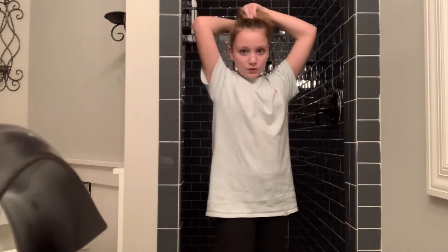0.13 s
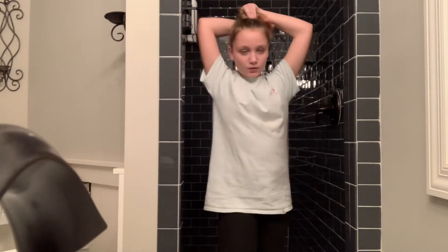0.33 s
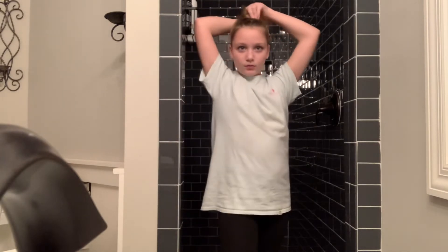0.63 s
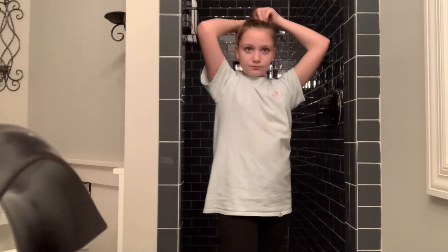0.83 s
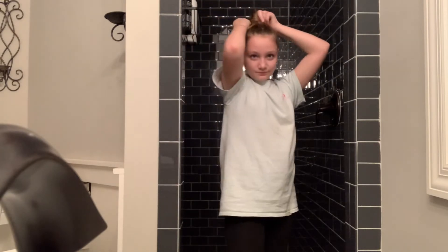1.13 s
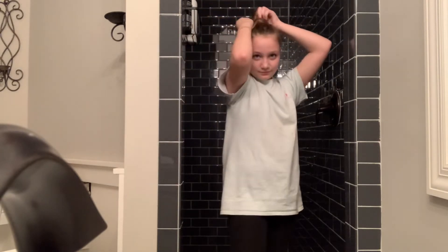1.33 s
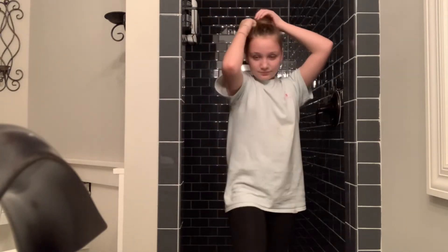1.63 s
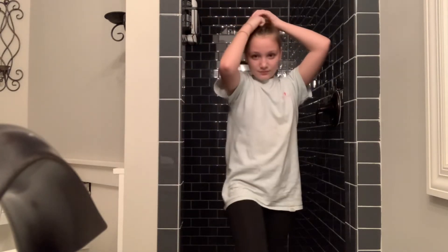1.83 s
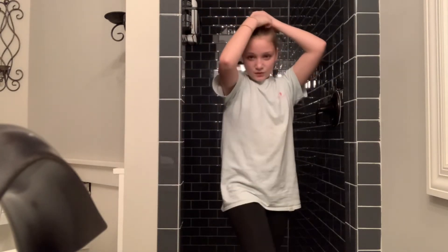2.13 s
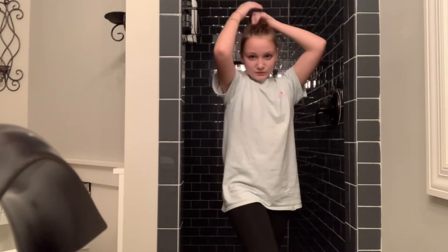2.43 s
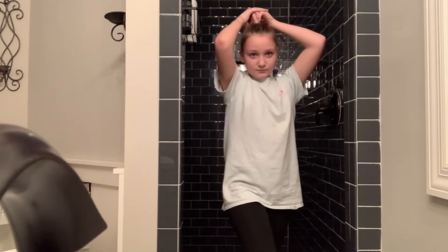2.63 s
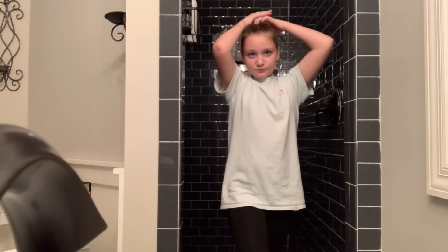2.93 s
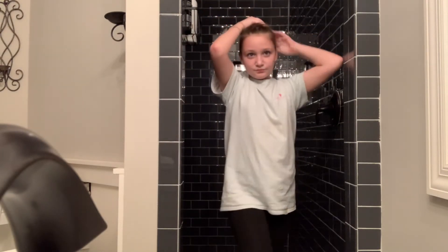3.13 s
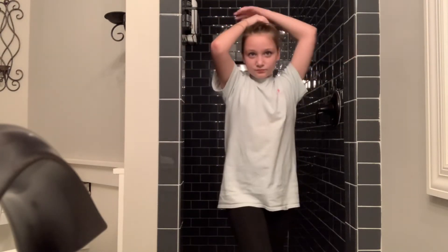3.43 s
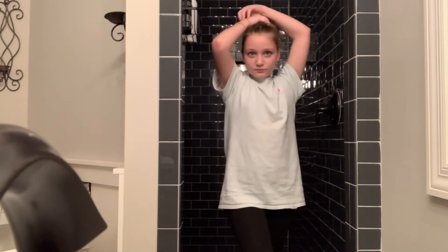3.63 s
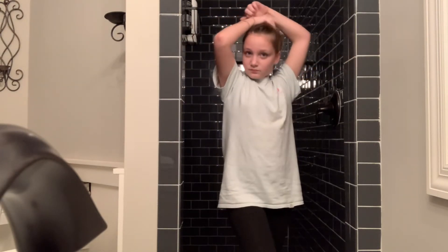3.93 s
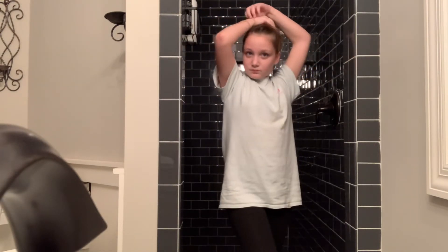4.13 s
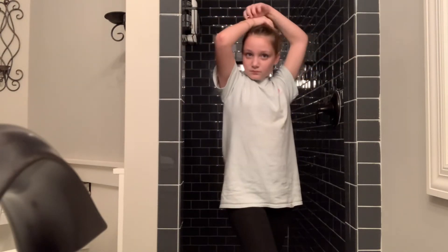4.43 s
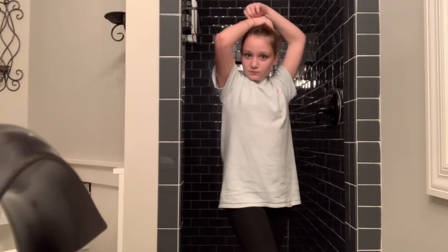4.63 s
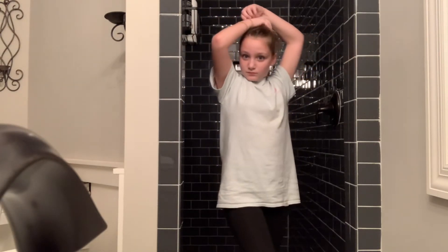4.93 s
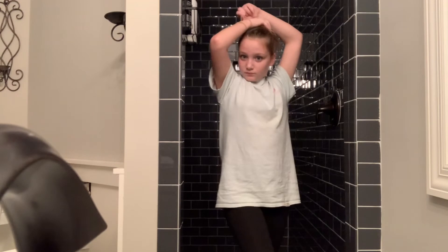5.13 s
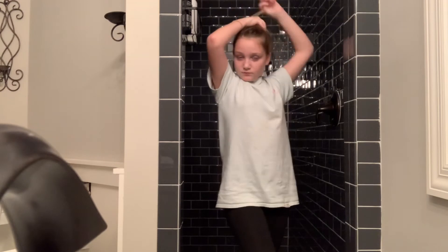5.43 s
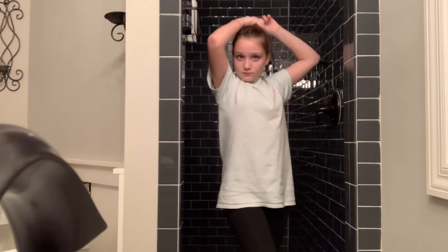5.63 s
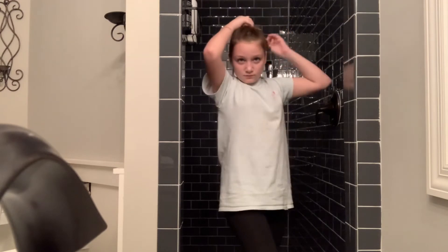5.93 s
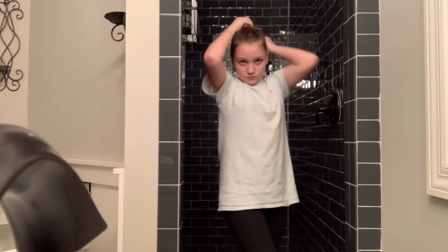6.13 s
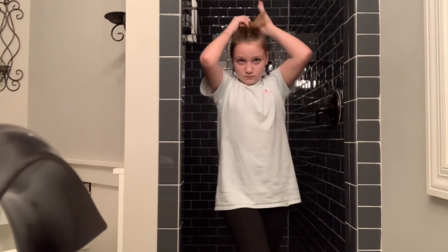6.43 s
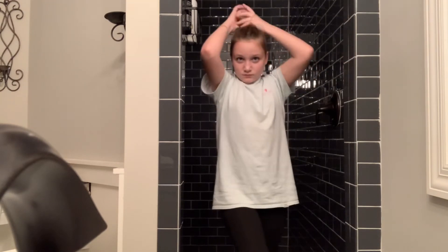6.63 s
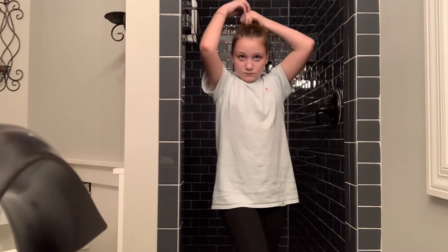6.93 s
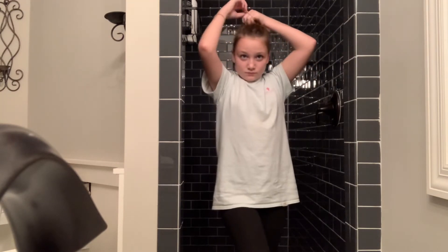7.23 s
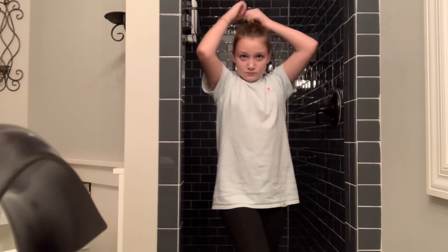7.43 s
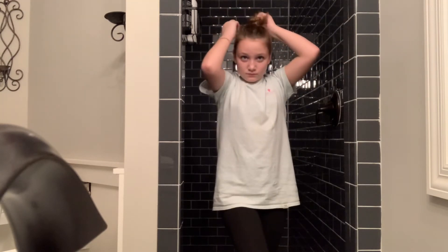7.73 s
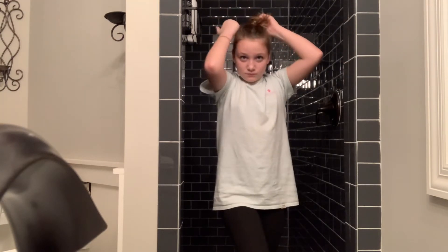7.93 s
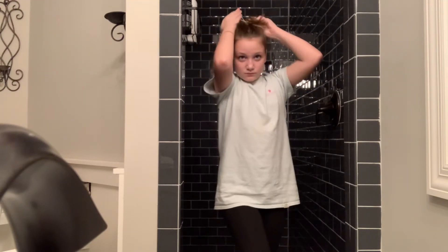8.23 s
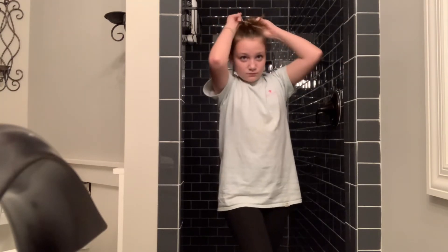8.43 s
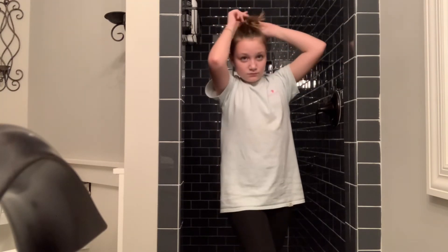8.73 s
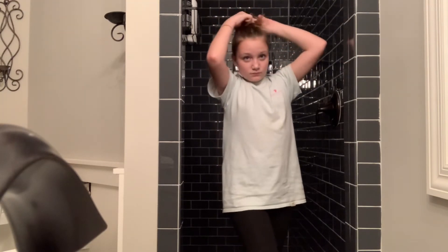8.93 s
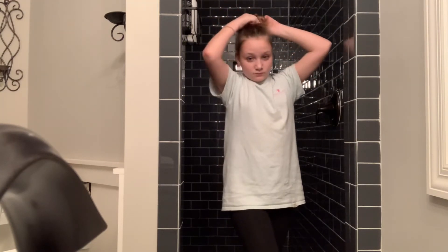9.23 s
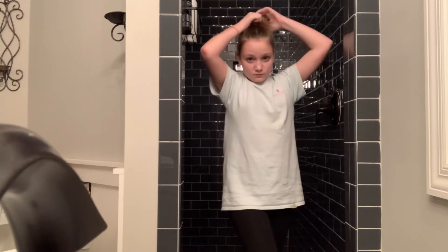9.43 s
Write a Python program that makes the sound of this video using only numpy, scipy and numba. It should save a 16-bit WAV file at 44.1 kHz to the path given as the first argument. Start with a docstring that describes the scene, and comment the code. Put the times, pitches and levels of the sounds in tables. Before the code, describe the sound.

For about 9.7 seconds, water pours without pause from a tap into a bathtub in a reverberant tiled bathroom. Low, boomy drumming, mostly below 400 Hz, surges unevenly, with soft thumps near 0.3, 1.3, 2.1, 2.4 and 2.9 seconds, then around 3.8, 4.9, 5.7 and 6.7 to 6.9. Over it lies a dense fizz of tiny rising bubbles, fullest in the mids with gentler airy spray. Gurgles swell at the start and near 1, 2.5, 3, 4.4, 6 and 7.5 seconds. Splashes and plops are scattered throughout: a bright one around 2.5, a high, pinging drip at 3.4, a cluster at 4.3 to 4.6, a sprayier burst at 6.8, several at 7 to 7.6, another near 8.1. The drumming dips around 4, 5.4 and 9.2 but the flow never stops. Stereo pickup at a distance, with short room smear and ringing tub tones.

```python
"""A low drumming and a steady fizz: a tap pours into a bathtub across a tiled bathroom.
The drumming is coloured noise that surges and thumps. The fizz is thousands of fading sines, one a
bubble or drop, with gurgles that swell and fade and, now and then, a louder splash.
The hard room smears the water and rings at its own pitches; two microphone ports hear it in stereo."""
import sys
import numpy as np
from scipy import signal
from scipy.fft import rfft, irfft
from scipy.io import wavfile
from scipy.ndimage import uniform_filter1d
from numba import njit

SR = 44100
rng = np.random.default_rng(int(sys.argv[2]) if len(sys.argv) > 2 else 0)


def log_audio(samples):
    """Write samples as a 16-bit WAV file to the path given in sys.argv[1]."""
    # one column per channel
    frames = np.atleast_2d(samples).T
    # limit to full scale, then quantise
    limited = np.clip(frames, -1, 1)
    pcm = np.round(limited * 32767).astype(np.int16)
    wavfile.write(sys.argv[1], SR, pcm)


def amplitude_ratio(level_db):
    """Convert a level in decibels to the matching linear amplitude (field) ratio."""
    exponent = np.asarray(level_db, float) / 20
    return 10 ** exponent


N = 422919  # samples
HZ = np.maximum(np.arange(N // 2 + 1) * SR / N, 1)  # frequency of each spectrum bin
SPRAY_HZ, SPRAY_FADE_S = 5000, .012  # lowest drop of a splash; time in which a burst of drops thins to 1/e


def unit(x):
    """Scale to rms 1."""
    return x / np.sqrt(np.mean(np.abs(x) ** 2))


def over_hz(table):
    """A (Hz, value) table read on a log-frequency axis."""
    hz, value = np.transpose(table)
    return np.interp(np.log(HZ), np.log(hz), value)


def walk(s, rate):
    """Random drift of spread near 1, read at times s, with so many knots per second (below 40)."""
    knots = rng.standard_normal(int(N / SR * 40) + 2)
    return np.interp(s * rate, np.arange(len(knots)), knots)


def outliers(chance, scatter_db, floor=1.01):
    """Extra level in dB: little for most bubbles, much for a few."""
    return -scatter_db * np.log(floor - chance)


def size_tilt(hz):
    """Level in dB that rises with a bubble's pitch."""
    return 15 * np.log10(hz / 1000)


@njit
def ring_out(n, start, turn, fade, glide, size):
    """Each bubble is a fading sine that rises in pitch."""
    out = np.zeros(n)
    for k in range(len(start)):
        value = size[k] + 0j
        step = fade[k] * np.exp(1j * turn[k])
        bend = np.exp(1j * glide[k])
        end = start[k] + int(-4.5 / np.log(fade[k]))
        for i in range(start[k], min(n, end)):
            value = value * step
            step = step * bend
            out[i] += value.imag
    return out


def bubbles(s, hz, db, cycles, rise):
    """Bubbles that fall to 1/e in so many cycles and rise in pitch by a share meanwhile."""
    turn = 2 * np.pi * np.clip(hz, 100, .42 * SR) / SR  # radians per sample
    life = cycles * 2 * np.pi / turn  # samples
    return ring_out(N, (s * SR).astype(int), turn, np.exp(-1 / life), rise * turn / life, amplitude_ratio(db))


def ports(a, b, alike):
    """Two ports that share this much of a sound at each frequency."""
    return np.array([a, alike * a + np.sqrt(1 - alike ** 2) * b])


# How the pour comes and goes. Each row: time in seconds, drumming level in dB (swings scaled per band),
# froth in dB above its usual level (lessened for the spray and the largest bubbles).
POUR = [(.05, -32.5, -0.5), (.35, -32, 1.5), (.8, -35, -1.5), (1.2, -33.5, -0.5), (1.5, -33.5, -1),
        (2.45, -34, 1), (2.8, -35, -2), (3.7, -32, 0.5), (4.0, -37.5, -1), (4.9, -31, 1),
        (5.4, -36.5, -0.5), (5.8, -34, 0.5), (6.55, -36.5, -2), (6.85, -34.5, 1), (7.8, -33, 1),
        (9.2, -37, 0), (9.55, -33.5, -1.5)]
# Heavier slugs of water thump the tub. Each row: time in seconds (half a thump length before the peak),
# peak in dB above the drumming (scaled per band).
SLUGS = [(.31, 8.5), (1.33, 4), (2.05, 4), (2.42, 8), (2.87, 6.5), (3.8, 3.5), (4.855, 3.5), (5.66, 4.5),
         (6.66, 7.5), (6.85, 8)]
# Colour of the drumming. Each row: frequency in Hz, relative level in dB per Hz.
DRUM_COLOUR = [(25, -40), (42, -16.5), (60, -10), (100, -9), (140, -2), (175, -6), (250, -7), (400, -13),
               (800, -28.5), (1500, -100)]
# Edges of the low, middle and high bands of the drumming: each entry a frequency in Hz.
DRUM_EDGES_HZ = [0, 95, 170, 20000]
# How far each band follows the pour and the thumps: each entry a share of the dB swing.
BAND_FOLLOW = [0.4, 1, .6]


def tub(ring, surge_db=1.5):
    """The jet's churning drives the tub walls and low room modes as noise; three bands surge apart."""
    thump_s, alike_hz = 0.036, 248
    t, drum_db, _ = np.transpose(POUR)
    s = np.arange(N) / SR
    flow_db = np.interp(s, t, drum_db)
    for at, db in SLUGS:
        flow_db += db * np.exp(-((s - at) / thump_s - .5) ** 2)
    mean_db = np.mean(flow_db)
    churn = 0
    for low, high, share in zip(DRUM_EDGES_HZ, DRUM_EDGES_HZ[1:], BAND_FOLLOW):
        swing_db = share * (flow_db - mean_db) + surge_db * walk(s, 14.0)
        noise = rng.standard_normal((2, N)) * amplitude_ratio(swing_db)
        churn = churn + rfft(noise, N) * ((HZ >= low) & (HZ < high))
    alike = 1 / (1 + (HZ / alike_hz) ** 6)  # the lowest modes fill the room as one
    drumming = irfft(ports(*churn, alike) * amplitude_ratio(over_hz(DRUM_COLOUR)) * ring, N)
    return unit(drumming) * amplitude_ratio(mean_db + 0.48)


def froth(per_s=5000, cycles=3.82, scatter_db=2.0, swell_db=1.0, patchy_db=1.26, quick_db=3.0):
    """The steady mass of bubbles where the jet lands; small ones are many, a few stand out."""
    gurgle_hz, fine_hz = 1560, 7500  # from the body of the froth to its spray
    when, which, chance = rng.random((int(per_s * N / SR), 3)).T
    s = when * N / SR
    hz = (14 + 120 * which) ** 2
    t, _, froth_db = np.transpose(POUR)
    fine = np.clip(np.log(hz / gurgle_hz) / np.log(fine_hz / gurgle_hz), 0, 1)
    follow = (1 - 0.32 * fine) * np.clip(np.log2(hz / 600), 0, 1)  # the largest bubbles come steadily
    db = follow * np.interp(s, t, froth_db)
    # neighbouring bubble sizes come and go together, slowly and quickly, the spray in gusts
    band = (2 * np.log2(hz / 190)).astype(int)  # half octaves
    for depth_db, rate in ((swell_db, 4.0), (patchy_db, 14.0)):
        db += depth_db * np.choose(band, [walk(s, rate) for _ in range(14)])
    db += quick_db * fine * walk(s, 16.0)
    db += size_tilt(hz) + outliers(chance, scatter_db, 1.003)  # the tilt makes it flat per Hz
    return unit(bubbles(s, hz, db, cycles, 0.043))


def patter(per_s=40, level_db=-13.5, scatter_db=1.5, octaves=.25, cycles=7.0, fade_s=.008, count=16):
    """Stray drops: many small sudden swarms, each around a bubble size of its own."""
    when, which, chance = rng.random((int(per_s * N / SR), 3)).T[:, :, None]
    late, size = rng.random((len(when), 2, count)).transpose(1, 0, 2)
    s = (when * N / SR - fade_s * np.log(1 - late)).clip(0, N / SR)
    hz = (32 + 92 * which) ** 2 * 2 ** (octaves * (size - .5))
    db = level_db + size_tilt(hz) + outliers(chance, scatter_db)
    return bubbles(s.ravel(), hz.ravel(), db.ravel(), cycles, 0.039)


def spatter(per_s=10, level_db=-14.0, scatter_db=3.0, low_hz=8000, cycles=3.3, count=30):
    """Small bursts of the finest drops, spread over one octave, come at random."""
    gap, chance = rng.random((100, 2)).T[:, :, None]
    late, size = rng.random((len(gap), 2, count)).transpose(1, 0, 2)
    s = np.cumsum(-np.log(1 - gap), axis=0) / per_s - SPRAY_FADE_S * np.log(1 - late)
    hz = low_hz * 2 ** size
    db = level_db + size_tilt(hz) + outliers(chance, scatter_db)
    return bubbles(s.ravel(), hz.ravel(), db.ravel(), cycles, 0.037)


# Longer gurgles that swell and fade. Each row: middle in seconds, length in seconds,
# pitch of the bubbles in Hz, range of pitch in octaves, bubble level in dB before the tilts for size.
SWELLS = [(0.101, 0.29, 1520, 1.5, -13.5), (1.022, 0.35, 3220, 0.24, -14.5), (2.503, 0.22, 2630, 1.35, -16),
          (3.05, 0.2, 1444, 0.27, -12.5), (4.447, 0.36, 2420, 1.27, -12), (5.952, 0.31, 2650, 0.95, -11.5),
          (7.46, 0.21, 2340, 0.89, -12)]


def gurgles(cycles=4.2, scatter_db=3.5, count=90):
    """Bubbles come thickest in the middle of each gurgle, a few of them standing out."""
    middle, length, hz, octaves, db = np.transpose(SWELLS)[:, :, None]
    a, b, size, chance = rng.random((len(middle), 4, count)).transpose(1, 0, 2)
    s = (middle + length * (a + b - 1) / 2).clip(0)
    pitch = hz * 2 ** (octaves * (size - .5))
    db = db + size_tilt(pitch) + 12 * np.log10(pitch / hz) + outliers(chance, scatter_db)
    return bubbles(s.ravel(), pitch.ravel(), db.ravel(), cycles, 0.067)


# Louder splashes. Each row: start in seconds, pitch of the bubbles in Hz, range of pitch in octaves,
# bubble level in dB, fine spray level in dB, both before the tilts for size.
SPLASHES = [(1.216, 4200, 0.68, -10, -11), (1.257, 1490, 0.59, -13, -3), (1.4662, 1960, 0.17, -8, -16),
            (1.7669, 2270, 1.1, -7.5, -11), (2.279, 1740, 0.44, -12, -15), (2.406, 3020, 1.16, -7.5, -8),
            (2.537, 2870, 1.3, -3, -7), (2.597, 1070, 0.09, -15, -15), (2.8567, 3460, 0.99, -11.5, -9),
            (3.398, 5120, .12, -3, -7), (3.52, 3180, 0.32, -11, -6), (4.268, 1650, 0.4, -12, -10),
            (4.412, 2110, 0.5, -12, -7), (4.487, 2300, 1.1, -9, -12), (4.557, 5030, .3, -7, -10),
            (5.42, 4180, 0.2, -7.5, -17), (5.8269, 2870, 1.6, -7, -9), (6.596, 3900, 0.11, -14, -20),
            (6.823, 3330, 0.37, -7.5, -1.5), (7.031, 3520, .2, -9, -19), (7.089, 2050, 0.47, -11, -13),
            (7.3925, 2390, 1.2, -6, -10), (7.5476, 2740, 0.84, -13.5, -7.5), (7.596, 2570, 1, -8, -20),
            (7.881, 1634, 0.51, -11, -14), (8.135, 1490, 0.49, -7.5, -7), (8.686, 1063, 0.34, -14, -18),
            (8.761, 2980, 0.77, -15, -9), (9.549, 4500, 0.49, -9, -10)]


def splashes(cycles=4.77, brighter_db=6, count=40):
    """Each splash is a sudden swarm of bubbles around one size, with fine drops, that thins out."""
    swarm_fade_s, spray_octaves = .007, 1.7
    s, hz, octaves, db, spray_db = np.transpose(SPLASHES)[:, :, None]
    late, size, spray_late, spray_size = rng.random((len(s), 4, count)).transpose(1, 0, 2)
    delay = -np.array([swarm_fade_s * np.log(1 - late), SPRAY_FADE_S * np.log(1 - spray_late)])
    start = s + delay
    spread = (np.arange(count) + size) / count - .5
    pitch = np.array([hz * 2 ** (octaves * spread), SPRAY_HZ * 2 ** (spray_octaves * spray_size)])
    db = np.array([db, spray_db]) + size_tilt(pitch)
    db[0] += 12 * np.log10(pitch[0] / hz)  # the smaller bubbles of a swarm ring louder
    db[1] += brighter_db * np.log10(pitch[1] / SPRAY_HZ)  # the spray is brighter than the froth
    # swarms of nearly one size ring longer and rise less, with the same energy
    longer = np.array([1 + 0.29 / octaves, np.ones_like(octaves)]) + 0 * pitch
    db = db - 10 * np.log10(longer)
    longer = longer.ravel()
    return bubbles(start.ravel(), pitch.ravel(), db.ravel(), cycles * longer, 0.074 / longer)


# Phase offset between the channels in the treble, which alters the stereo image.
# Each row: frequency in Hz, offset in radians.
TREBLE_PHASE = [(6000, 1.44), (7300, 2), (7800, 2.67), (10200, 3.72), (11500, 4.85), (13000, 6.2)]


def room():
    """Response from one spot of the tub: a diffuse tail, and treble alike in both channels but for phase."""
    t60_low_s, t60_high_s, wall_hz = .45, .25, 3000  # decay below and above the walls' turnover
    port_gap_m, click_share, alike_hz = 0.35, 0.42, 6850
    t = np.arange(SR // 2) / SR
    low = 1 / (1 + (HZ / wall_hz) ** 2)
    tails = []
    for noise in rng.standard_normal((2, len(t))):
        slow = unit(rfft(noise * 1000 ** (-t / t60_low_s), N))
        fast = unit(rfft(noise * 1000 ** (-t / t60_high_s), N))
        tail = low * slow + (1 - low) * fast
        tails.append(tail / np.sqrt(uniform_filter1d(np.abs(tail) ** 2, size=70)))  # even colour
    tails = ports(*tails, np.sinc(2 * HZ * port_gap_m / 343))  # a diffuse field
    # part of the treble is a click, the rest a short tail
    click = click_share * (1 - low)
    left = np.sqrt(click) + np.sqrt(1 - click) * tails[0]
    # the top is alike in both channels, with a phase offset that changes with frequency
    alike = 1 / (1 + (alike_hz / HZ) ** 12)
    offset = left * np.exp(-1j * over_hz(TREBLE_PHASE))
    return np.array([left, np.sqrt(alike) * offset + np.sqrt(1 - alike) * tails[1]])


def causal(gain):
    """The same gains with minimum phase, so they ring only after the blow."""
    cepstrum = irfft(np.log(gain), N)
    cepstrum[:, 1:(N + 1) // 2] *= 2
    cepstrum[:, (N + 1) // 2:] = 0
    return np.exp(rfft(cepstrum))


# Resonances of tub and room. Each row: frequency in Hz, width in Hz, height in dB above the
# surroundings, left minus right in dB.
RESONANCES = [(55, 5.1, 13, -2), (75.4, 3.9, 16.5, -5), (88, 3.7, 5.5, -1), (106.8, 8, 10.5, 0),
              (128.5, 12, 13.5, -3), (191, 9.4, 6, -1), (210, 11.3, 5, -4.5), (236.3, 8.7, 6.5, 1.5),
              (303, 5.7, 3, 2), (440.3, 7.6, 9.5, -3), (502, 10.2, 7, -2), (582.3, 5.6, 7.5, 5.5),
              (608, 12.5, 10, -3), (694, 16, 6.5, 2.5), (1062, 12.5, 8.5, 0.5), (1227, 21, 4, 13.5),
              (1379, 20, 5, -2), (1470, 52, 4, 2), (1549, 25, 3, -7), (1766, 17, 2, 14), (2050, 18, 5, 7),
              (3460, 60, 5, 6.5)]
# Balance of the two ports. Each row: frequency in Hz, left minus right in dB.
PORT_BALANCE = [(60, -1.5), (110, -2), (300, -0.5), (700, -2.5), (1290, -2.5), (2380, -1.5), (4400, 0.5),
                (15000, 0)]


def ringing():
    """Tub and room modes as resonant peaks, with the balance of the two ports."""
    half = np.array([[.5], [-.5]])
    power = 1
    for hz, width, db, pan in RESONANCES:
        power = power + amplitude_ratio(db + half * pan) ** 2 / (1 + (2 * (HZ - hz) / width) ** 2)
    return causal(np.sqrt(power) * amplitude_ratio(half * over_hz(PORT_BALANCE)))


# Colour of the bubbles at the ports. Each row: frequency in Hz, relative level in dB per Hz.
WATER_COLOUR = [(60, -60), (200, -7.5), (400, -2.5), (730, -4.5), (850, -8), (1020, -6.5), (1500, -7),
                (2300, -7.5), (3300, -12.5), (4000, -14.5), (6500, -19), (9000, -19.5), (13000, -23.5),
                (15700, -25), (15900, -70)]


def scene():
    """Bubbles from two spots, each with its own path through the room, over the drumming tub."""
    water_db, direct_db, spots = -34, -7, 2  # direct: the splashes' straight path
    ring, sudden = ringing(), splashes()
    bursts = sudden + gurgles() + spatter()
    heard = 0
    for _ in range(spots):
        heard = heard + rfft(froth() + patter() + bursts, N) * room()
    # the straight path fades out towards the treble
    straight = amplitude_ratio(direct_db) * np.clip(1 - HZ / SPRAY_HZ, 0, 1) ** .5 * rfft(sudden, N)
    water = irfft((heard + straight) * amplitude_ratio(over_hz(WATER_COLOUR)) * ring, N)
    return amplitude_ratio(water_db) * unit(water) + tub(ring)


def band_limit(x):
    """A steep low-pass at the top of the band."""
    return signal.sosfilt(signal.butter(12, 16550, fs=SR, output="sos"), x)


def record(dry):
    """Take down the finished mix."""
    return band_limit(dry)


dry = scene()
out = record(dry)
log_audio(out)
```